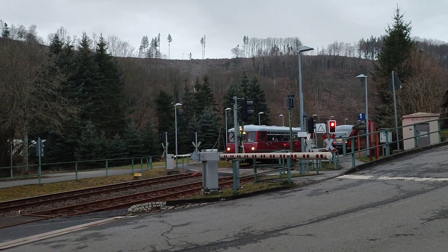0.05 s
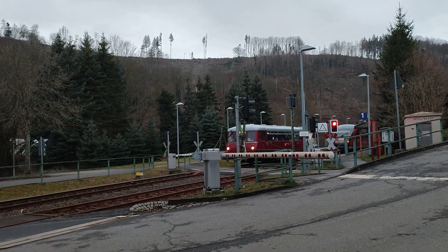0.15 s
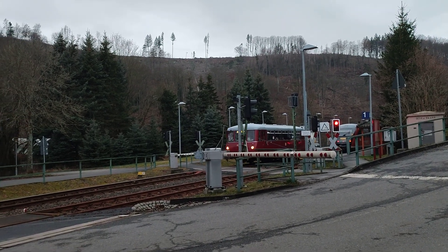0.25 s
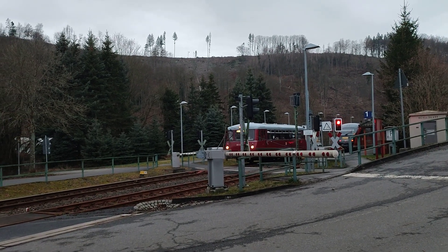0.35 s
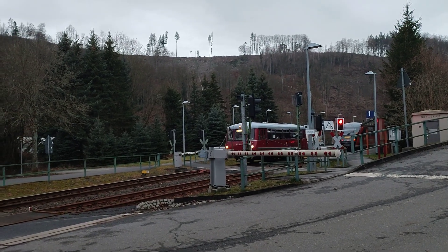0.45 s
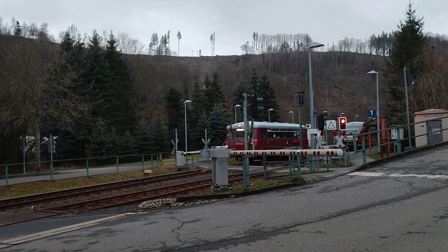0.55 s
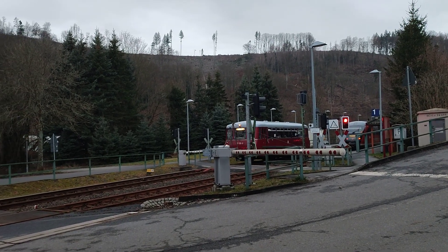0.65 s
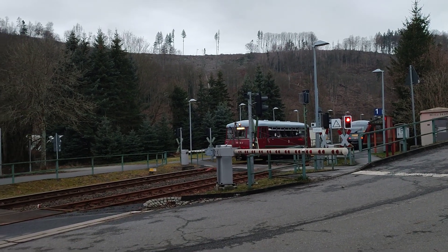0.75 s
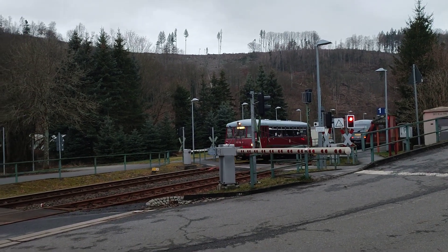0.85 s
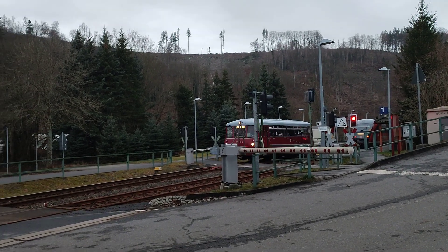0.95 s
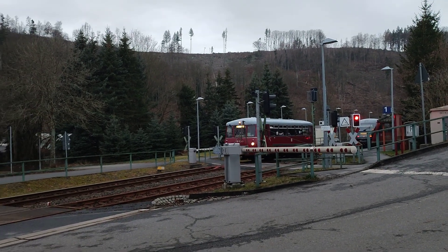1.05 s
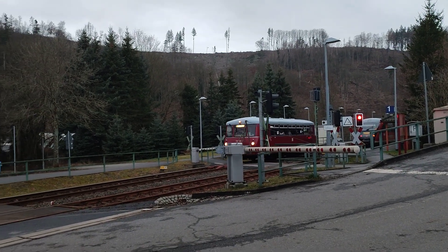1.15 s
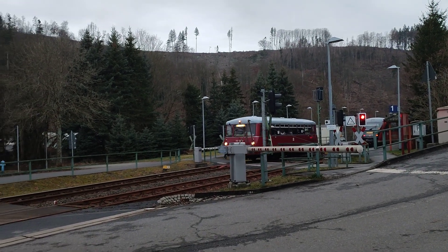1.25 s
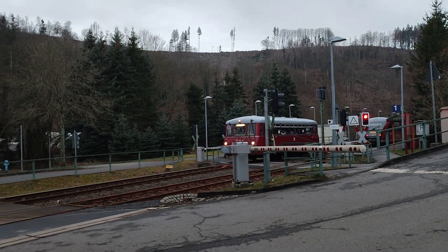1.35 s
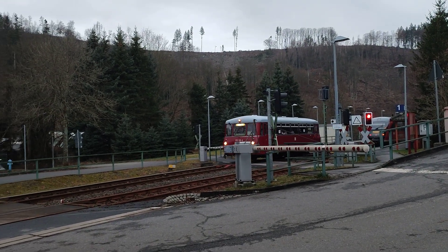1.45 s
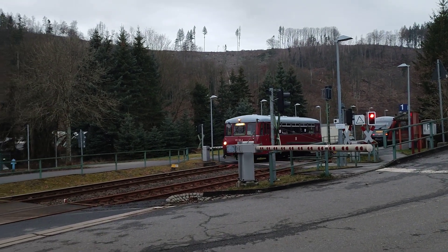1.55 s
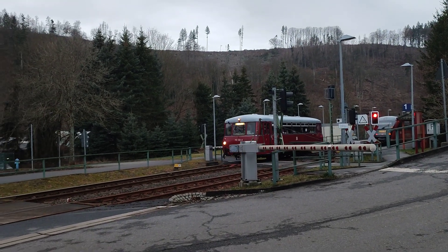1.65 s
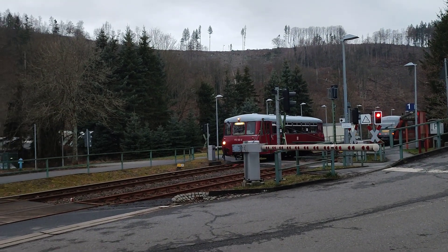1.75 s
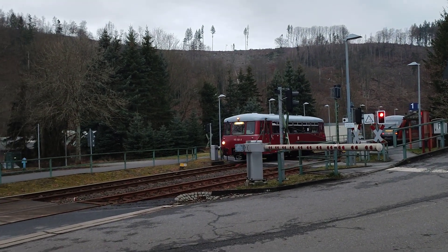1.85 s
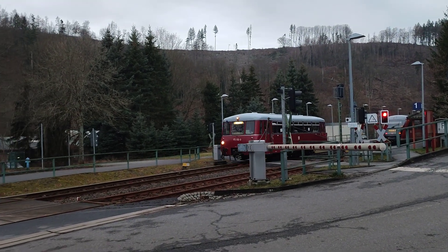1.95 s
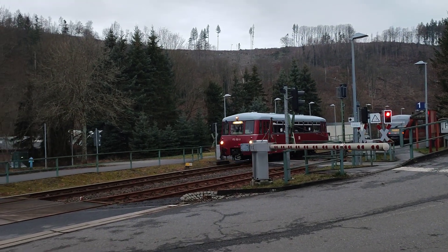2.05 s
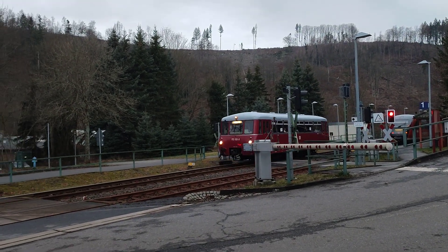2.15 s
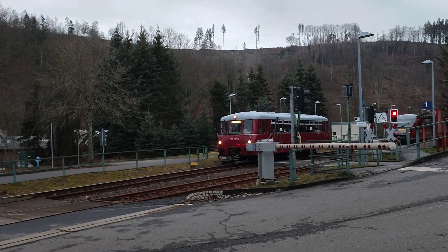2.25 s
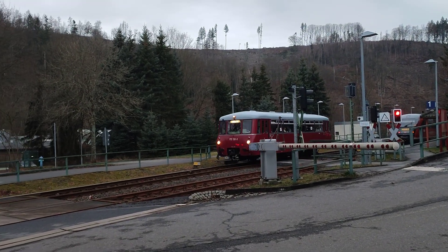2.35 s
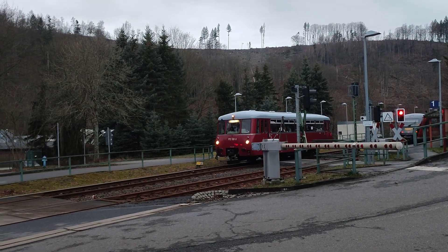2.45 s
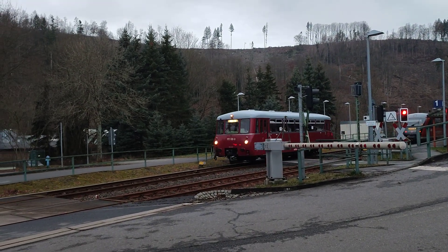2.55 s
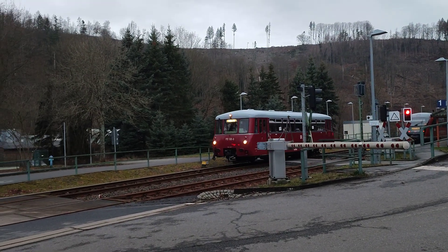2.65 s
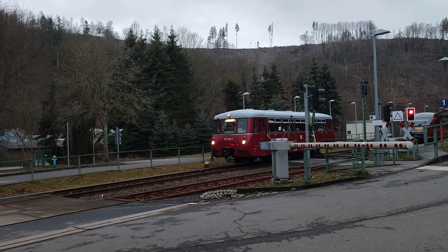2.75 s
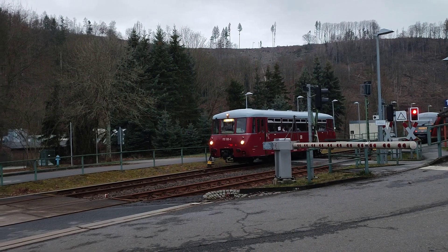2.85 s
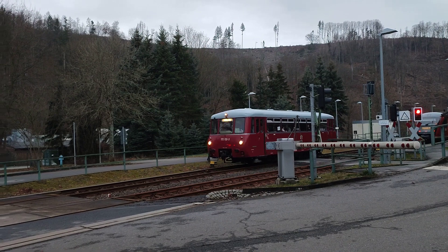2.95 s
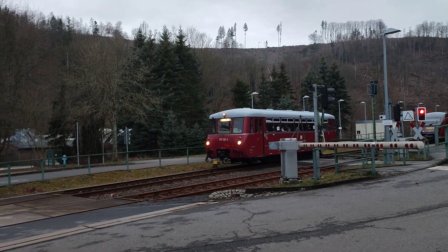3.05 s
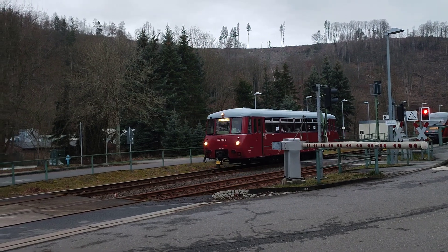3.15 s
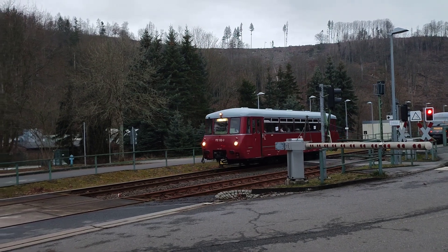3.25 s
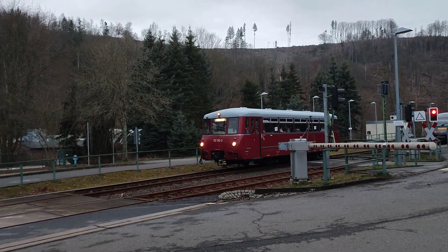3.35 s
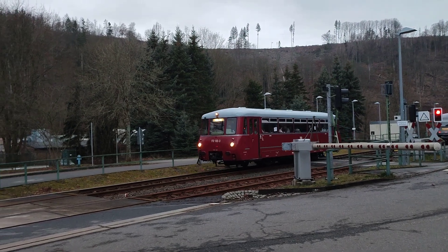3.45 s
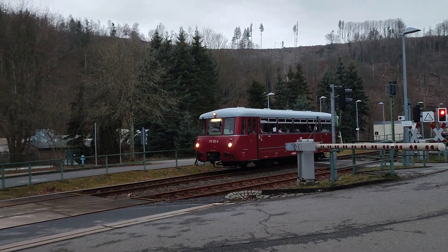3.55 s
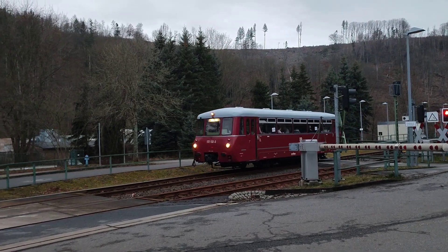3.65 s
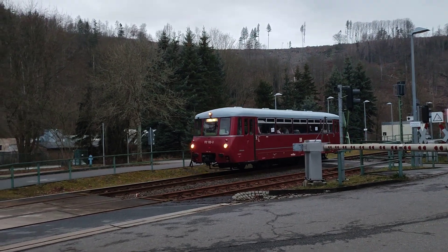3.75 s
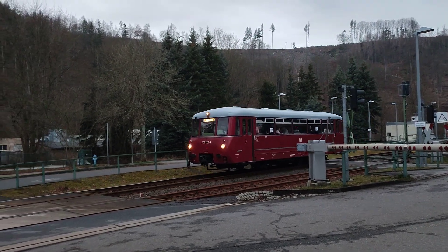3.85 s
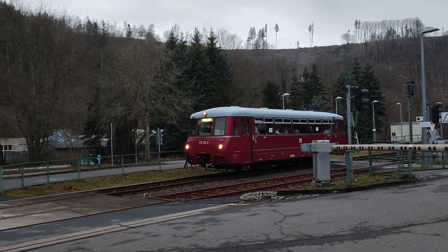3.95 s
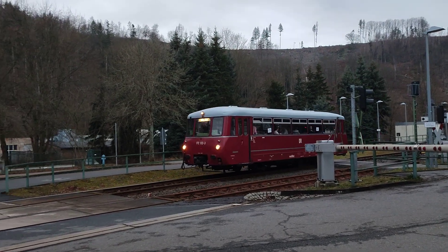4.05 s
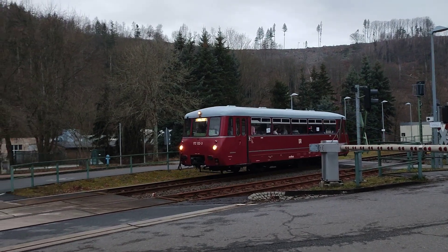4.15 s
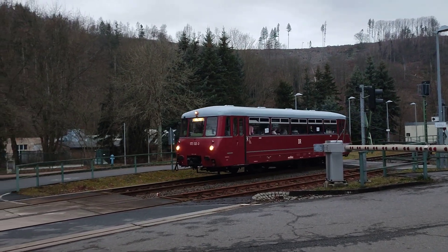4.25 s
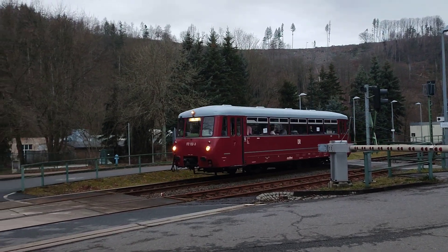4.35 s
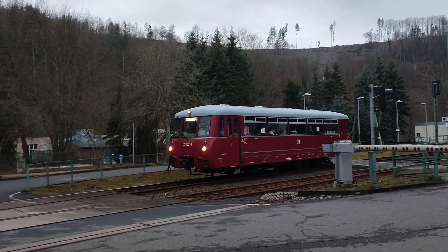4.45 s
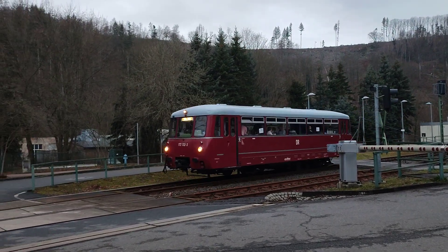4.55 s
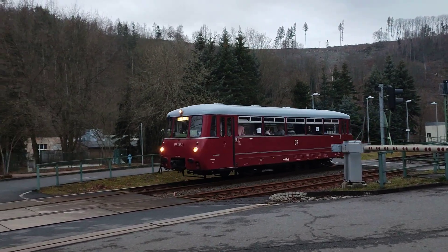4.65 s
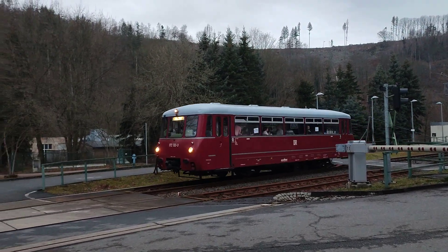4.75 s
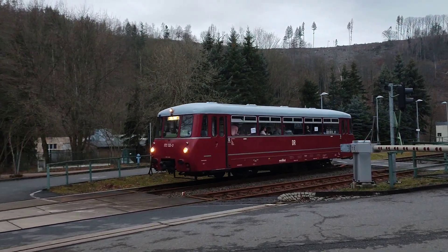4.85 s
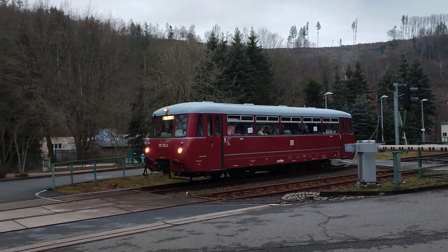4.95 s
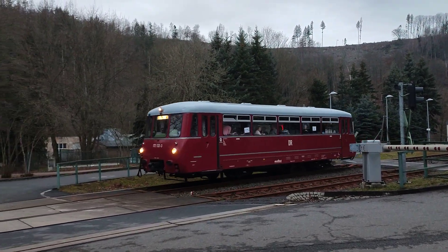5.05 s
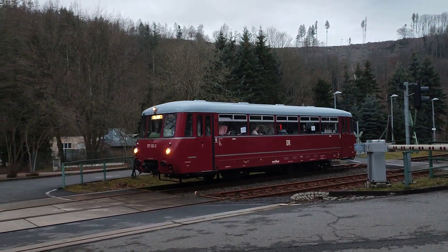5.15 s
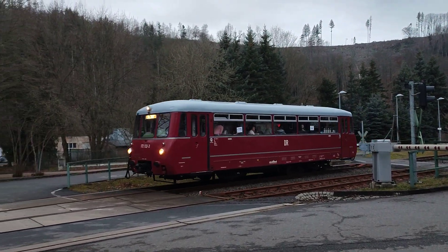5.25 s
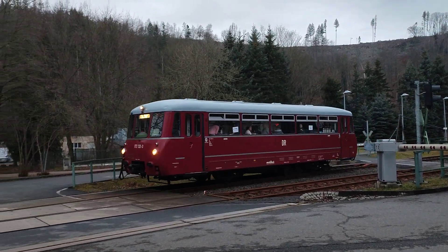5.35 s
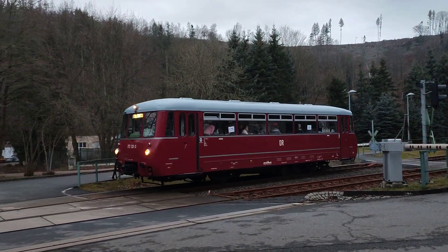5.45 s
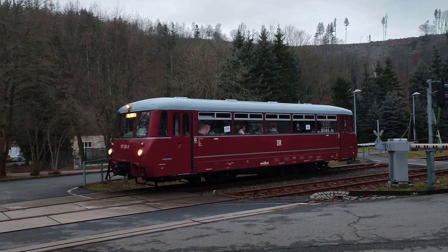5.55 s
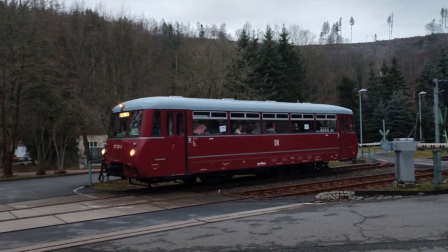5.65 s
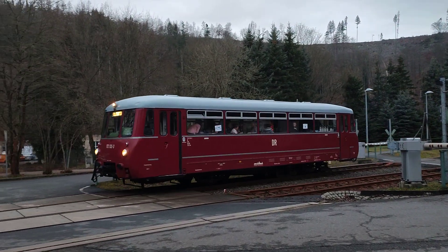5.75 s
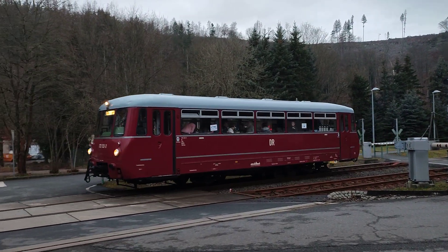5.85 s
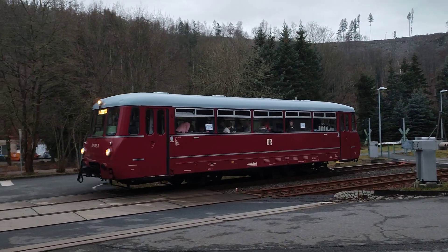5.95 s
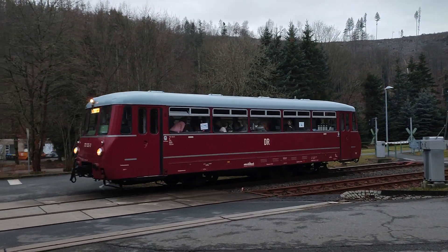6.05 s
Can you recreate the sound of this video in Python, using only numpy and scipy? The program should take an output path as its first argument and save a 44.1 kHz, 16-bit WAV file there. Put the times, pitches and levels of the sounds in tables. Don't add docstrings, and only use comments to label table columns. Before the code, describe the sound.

Low rumble and a pulling diesel engine come from a little way off, with a car idling faintly nearby and one tiny metallic tick. The railbus nears, revs up with sharper clatter and airy hiss, then drops to a slow idle. Dull thuds of wheels on joints grow strong, the rails roar, and short high rubs appear as it passes close to the stereo microphones in the open air.

```python
import sys
import numpy as np
from scipy import signal
from scipy.fft import rfft, irfft
from scipy.io import wavfile
from scipy.ndimage import uniform_filter1d

SR = 44100
rng = np.random.default_rng(int(sys.argv[2]) if len(sys.argv) > 2 else 0)


def int16_out(signal):
    q = np.round(np.clip(np.atleast_2d(signal).T, -1, 1) * 32767)
    wavfile.write(sys.argv[1], SR, q.astype(np.int16))


def elevation(decibels):
    levels = np.asarray(decibels, float)
    return 10 ** (levels / 20)


N = 268569
TIME = np.arange(N) / SR

# start_s, firing_hz
FIRING = [(0, 52.9), (1.1, 53.9), (2.4, 55.0), (3.05, 55.6), (3.3, 58.6), (3.45, 60.7), (3.6, 61.8),
          (3.9, 63.2), (4.05, 63.8), (4.2, 62.9), (4.35, 60.9), (4.5, 58.3), (4.65, 54.7), (4.8, 50.0),
          (4.95, 45.0), (5.1, 42.1), (5.4, 39.1), (6.09, 39.6)]
# start_s, gain_db
APPROACH = [
    (0, 0.3),
    (1.0, 2.5),
    (1.7, 5),
    (2.4, 8),
    (3.0, 8.5),
    (4.3, 10),
    (4.7, 9.5),
    (5.4, 11.5),
    (6.09, 14.5),
]


def evened(x):
    return x / np.sqrt(np.mean(x ** 2) + 1e-20)


def curves(rows):
    s, *columns = np.transpose(rows)
    return [np.interp(TIME, s, c) for c in columns]


def bumps(rows):
    return sum(db * np.exp(-((TIME - s) / half_width_s) ** 2) for s, db, half_width_s in rows)


def drift(rate_hz):
    step_hz = 40
    count = int(N / SR * step_hz)
    pole = np.exp(-2 * np.pi * rate_hz / step_hz)
    steps = signal.lfilter([1], [1, -pole], rng.standard_normal(count))
    return np.interp(TIME, np.arange(count) / step_hz, evened(steps - steps.mean()))


def read(points, hz):
    f, value = np.transpose(points)
    return np.interp(np.log(hz + 1), np.log(f + 1), value, left=-90, right=-90)


def noise(spectrum, patchy_db):
    patches = rng.standard_normal((N // 256 + 5, 513))
    patches = uniform_filter1d(patches, size=10, axis=0)
    patches = evened(uniform_filter1d(patches, size=9, axis=1))
    white = rng.standard_normal((2, N))
    z = signal.stft(white, nperseg=1024, noverlap=768)[2]
    z = z * elevation(patchy_db * patches.T[:, :z.shape[2]])
    patchy = signal.istft(z, nperseg=1024, noverlap=768)[1][:, :N]
    colour = elevation(read(spectrum, np.fft.rfftfreq(N, 1 / SR)))
    return evened(irfft(rfft(patchy) * colour, N))


def resonate(x, hz, width_hz):
    b, a = signal.iirpeak(hz, hz / width_hz, SR)
    return signal.lfilter(b, a, signal.lfilter(b, a, x))


def rolling(start_db, approach_share, hush_share):
    start_s, end_s, edge_s, hush_db = 4.7, 5.29, .1, -6
    slabs = np.clip(np.minimum(TIME - start_s, end_s - TIME) / edge_s + .5, 0, 1)
    return start_db + approach_share * curves(APPROACH)[0] + hush_share * hush_db * slabs


def driven(start_db, approach_share, open_db, lag_s):
    # start_s, opening (0-1)
    throttle = [(0, .48), (3.02, .52), (3.2, .8), (3.6, .98), (4.05, .97), (4.3, .68), (4.58, .14),
                (5.2, .03), (5.38, .3), (5.6, .14), (5.8, .3), (6.09, .2)]
    s, opening = np.transpose(throttle)
    pull = np.interp(TIME - lag_s, s, opening)
    return start_db + approach_share * curves(APPROACH)[0] + open_db * pull


def idler():
    # pitch_hz, level_db
    idle_lines = [(20.1, -64), (32.6, -60), (40.0, -49), (65.3, -56)]
    out = 0
    for hz, db in idle_lines:
        level = np.sqrt(2) * elevation(db + 0.77 * drift(1.7))
        out = out + level * np.sin(2 * np.pi * (hz * TIME + rng.random()))
    return out


def tick():
    start_s, peak_db, pitch_hz, t60_s = 1.008, -33, 3050, .018
    t = np.maximum(TIME - start_s, 0)
    return elevation(peak_db - 60 * t / t60_s) * np.sin(2 * np.pi * pitch_hz * t) * np.minimum(t / .001, 1)


def flanges():
    # start_s, level_db, length_s
    chirps = [
        (5.37, -57, .03),
        (5.5, -52, .04),
        (5.57, -55, .07),
        (5.68, -52, .06),
        (5.76, -53, .04),
        (5.83, -54, .06),
        (5.91, -52, .06),
        (6.01, -53, .08),
    ]
    # pitch_hz, width_hz, level_db
    wheel_modes = [(5150, 200, -13), (6030, 170, 0), (7600, 250, -6)]
    rub = 0
    for s, db, length_s in chirps:
        rub = rub + elevation(db) * np.exp(-((TIME - s - length_s / 2) / (.5 * length_s)) ** 2)
    white = rng.standard_normal((2, N))
    return rub * evened(sum(elevation(db) * resonate(white, hz, width) for hz, width, db in wheel_modes))


def joints():
    # start_s, peak_db, pitch_hz, brightness_db (an octave)
    joint_hits = [(0.488, -35, 129, -15), (1.129, -39, 271, -21), (2.328, -25.5, 301, -19),
                  (4.681, -14, 108, -18), (5.165, -15.5, 212, -11), (5.19, -12.5, 160, -6.5),
                  (5.465, -11, 239.4, -12), (5.682, -24, 167, -2.5), (5.699, -17, 226, -7),
                  (5.75, -19, 242, -22), (6.014, -19, 285.5, -6)]
    # pitch_hz, t60_s
    joint_decay = [(110, 0.097), (230, 0.18), (480, 0.31), (1100, 0.033)]
    out, t = np.zeros((2, N + SR)), np.arange(SR // 2) / SR
    f, t60 = np.transpose(joint_decay)
    for s, db, hz, bright_db in joint_hits:
        ring = np.sin(2 * np.pi * hz * t) * elevation(-60 * t / np.interp(hz, f, t60))
        rattle = 0
        for centre_hz, decay_s in zip(f, t60):
            burst = evened(resonate(rng.standard_normal((2, len(t))), centre_hz, 0.54 * centre_hz))
            tilt_db = bright_db * np.log2(centre_hz / 230) * (centre_hz > 300)
            rattle = rattle + burst * elevation(-60 * t / decay_s + tilt_db)
        thump = (0.74 * ring + 0.29 * rattle) * np.minimum(t / 0.013, 1)
        out[:, round(s * SR):][:, :len(t)] += elevation(db - 4.0) * thump
    return out[:, :N]


def wheels():
    # pitch_hz, level_db (per Hz)
    rumble_colour = [(2, -29), (30, -21), (45, -6.5), (72, -17.5), (102, 1), (125, -4), (160, -11),
                     (200, -14), (228, -6), (265, -6), (320, -10), (380, -26), (500, -23.5)]
    roar_far = [(190, -1), (330, -2.5), (403, -25.5), (443, -33), (560, -3), (608, -5.5), (816, -5),
                (1070, -3), (1390, -12.5), (1700, -19.5), (2210, -36), (3740, -120)]
    roar_near = [(190, -41), (330, 1.5), (366, -11.5), (526, -5.5), (608, -4.5), (692, -9.5), (856, -8),
                 (1230, -8.5), (1350, -15.5), (1700, -28), (2210, -62), (3740, -120)]
    fizz_colour = [(2400, 3.5), (3200, -2), (4000, -1.5), (5000, 0), (6200, -0.5), (7600, -7.5),
                   (8600, -17.5), (10300, -13), (12500, -18.5), (14000, -20), (15000, -20), (15300, -70)]
    # pitch_hz, width_hz, level_db
    body_modes = [(108, 31, -12.5), (226, 4.5, -0.5), (250.2, 5.7, -4.5), (305.3, 6.3, -14.5)]
    # start_s, nearness (0-1)
    nearness = [
        (0, 0.25),
        (3.0, 0),
        (4.6, 0.43),
        (5.2, 0.94),
        (6.09, 0.88),
    ]
    # centre_s, swell_db, half_width_s
    swells = [(.03, 6.5, .1), (.8, -13, 0.13), (1.4, 0, 0.22), (2.68, 3, 0.081), (2.93, -1, .07),
              (3.1, 3.5, 0.064), (3.5, 4, 0.33), (4.15, 1.5, .1), (4.62, 4.5, 0.11), (5.08, 0, .08),
              (5.6, 2, 0.11), (5.87, -3.5, 0.11)]
    rumble_db = rolling(-51, approach_share=1.225, hush_share=0.19) + bumps(swells)
    roar_db = rolling(-52.5, approach_share=0.99, hush_share=0.84)
    fizz_db = rolling(-64, approach_share=0.96, hush_share=0.23)

    near = np.clip(curves(nearness)[0], 0, 1)
    roar = np.sqrt(1 - near) * noise(roar_far, 0.57) + np.sqrt(near) * noise(roar_near, 1.25)
    shake = rng.standard_normal((2, N))
    body = evened(sum(elevation(db) * resonate(shake, hz, width) for hz, width, db in body_modes))
    rumble = elevation(rumble_db - .6 + 2.9 * drift(4.3)) * noise(rumble_colour, 0.49)
    fizz = elevation(fizz_db + 1.42 + .5 * drift(5.0)) * noise(fizz_colour, 1.43)
    return rumble + elevation(-36.0) * near * body + elevation(roar_db - 0.55) * roar + fizz


def compressor():
    # place (0-1 of a turn), level_db, start_hz, end_hz, length_s
    strokes = [
        (.0, 0, 303, 254, .06),
        (.64, -4.0, 286, 246, .052),
    ]
    # centre_s, level_db, half_width_s
    hidden = [
        (4.15, -2.5, 0.25),
        (4.62, -4, 0.054),
        (5.6, -9, 0.22),
    ]
    turns_per_firing = .1506
    turns = np.cumsum(turns_per_firing * curves(FIRING)[0]) / SR
    out = np.zeros(N)
    for place, db, start_hz, end_hz, length_s in strokes:
        count = round(length_s * SR)
        fall_hz = np.linspace(start_hz, end_hz, count)
        gulp = np.hanning(count) * np.sin(2 * np.pi * np.cumsum(fall_hz) / SR)
        clicks = np.diff(np.floor(turns - place + .002 * drift(2)), prepend=-1) > 0
        out += signal.oaconvolve(clicks * elevation(db + .6 * drift(9)), gulp)[:N]
    knock_db = driven(-50, approach_share=1.0852, open_db=3, lag_s=0.6) + bumps(hidden)
    return elevation(knock_db - 2.0) * evened(out)


def engine():
    # multiple (of the firing rate), level_db
    exhaust_orders = [(.5, -68), (1.5, -62), (2, -53), (2.5, -58), (3, -55.5), (3.5, -57), (4, -52.5),
                      (4.5, -60)]
    # pitch_hz, level_db (per Hz)
    clatter_colour = [(650, -34), (1100, -6), (1400, -4), (1620, -2.5), (1760, 1.5), (1900, 0.5),
                      (2000, -3), (2380, -5), (2670, -11.5), (3510, -15), (4000, -46), (5200, -53)]
    hiss_colour = [(4500, -30), (5600, -8), (6500, 1), (7200, 3.5), (8000, -2), (8700, -8), (9500, -19),
                   (10300, -13.5), (11300, -31), (12600, -12), (14000, -31), (15000, -37), (15300, -70)]
    # centre_s, depth_db, half_width_s
    nulls = [
        (0.03, -14, 0.24),
        (1.12, -5, 0.18),
        (1.88, -10.5, 0.15),
        (2.8, -11, 0.15),
        (3.4, -1, 0.17),
        (4.0, -3, .08),
        (4.4, -4.5, .08),
        (5.15, -24, .14),
        (5.63, -10, 0.1),
    ]
    beat_db = driven(-44, approach_share=0.2433, open_db=4.5, lag_s=0.5) + bumps(nulls)
    clatter_db = driven(-59, approach_share=0.6362, open_db=11, lag_s=0.33)
    hiss_db = driven(-76, approach_share=1.3033, open_db=16.5, lag_s=-0.01)

    hz = curves(FIRING)[0]
    turns = np.cumsum(hz) / SR
    beat = elevation(beat_db) * np.sin(2 * np.pi * turns)
    trend_db = 0.33 * TIME - 0.6 * np.maximum(hz - 56, 0)
    orders = 0
    for k, db in exhaust_orders:
        level = elevation(db + trend_db + 2.3 * drift(1.7))
        orders = orders + level * np.sin(2 * np.pi * (k * turns + rng.random()))

    effort = np.clip((hz - 54) / 9, 0, 1)
    count = int(turns[-1]) + 1
    size = elevation(3.0 * rng.standard_normal(count) + 3 * (-1) ** np.arange(count))
    phase = turns % 1
    puffs = size[turns.astype(int)] * np.exp(-phase / 0.41) * np.minimum(phase / 0.074, 1)
    gate = 1 + (.28 + .57 * effort) * puffs
    gate /= np.sqrt(uniform_filter1d(gate ** 2, size=8000))
    clatter = elevation(clatter_db + 0.84) * noise(clatter_colour, 0.83) * gate ** 0.93
    hiss = elevation(hiss_db - 0.8 + .5 * drift(16.0)) * noise(hiss_colour, 1) * gate
    return np.sqrt(2) * (beat + orders) + clatter + hiss


def scene():
    return idler() + tick() + flanges() + joints() + wheels() + compressor() + engine()


def band_limit(x):
    return signal.sosfilt(signal.butter(12, 15010, fs=SR, output="sos"), x)


def record(dry):
    # pitch_hz, likeness (0-1), left_lag_rad, left_over_right_db
    ports = [(151, 1.1, 0.076, -0.5), (324, 1, 0.22, 0.5), (1190, 0.64, 0.95, -1.2), (2000, 0.73, 1.4, -5),
             (3180, 0.5, 1.46, 0), (3900, 0.61, 2.47, 1), (4800, 0.33, 3.3, -5.5), (7350, 0.23, 4.14, -5.5),
             (8440, 0.64, 3.2, 11.5), (8660, 0, 1.2, 7), (8900, 0, 3.5, 14), (9800, 0, 1.8, -16),
             (10300, .1, 3.1, -20), (11400, 0.16, 1.1, -2.5)]
    hz = np.fft.rfftfreq(N, 1 / SR)
    f, *columns = np.transpose(ports)
    same, lag, balance_db = (np.interp(hz, f, c) for c in columns)
    same = np.clip(same, 0, 1)
    direct, scattered = rfft(dry)
    share = elevation(balance_db) / np.sqrt(1 + elevation(2 * balance_db))
    left = direct * np.exp(-1j * lag) * share
    mixed = same * direct + 1j * np.sqrt(1 - same ** 2) * scattered
    right = mixed * np.sqrt(1 - share ** 2)
    return band_limit(np.sqrt(2) * irfft(np.array([left, right]), N))


dry = scene()
out = record(dry)
int16_out(out)
```